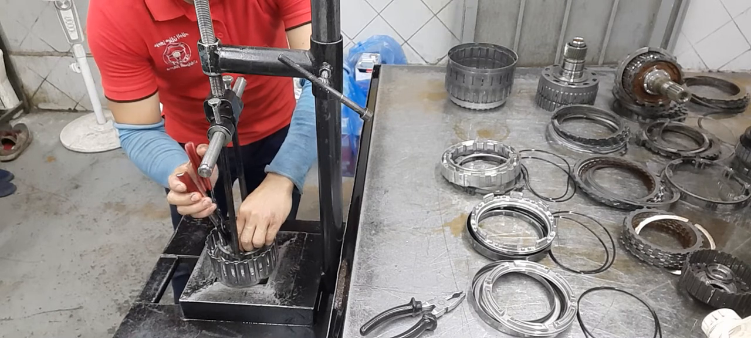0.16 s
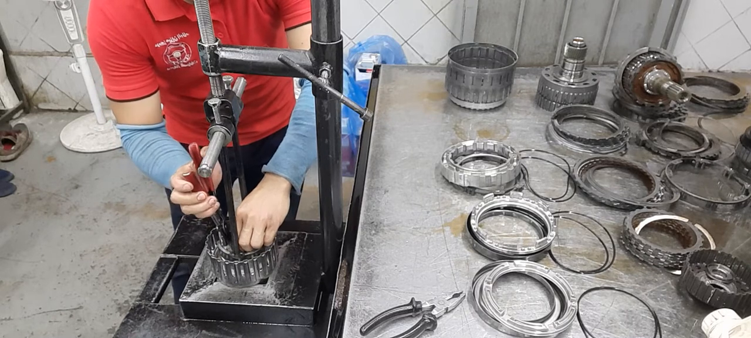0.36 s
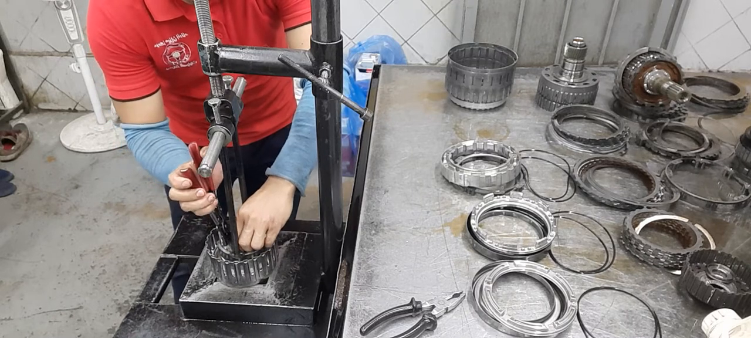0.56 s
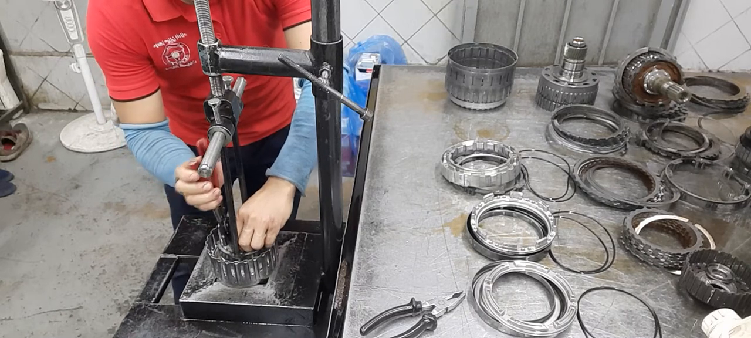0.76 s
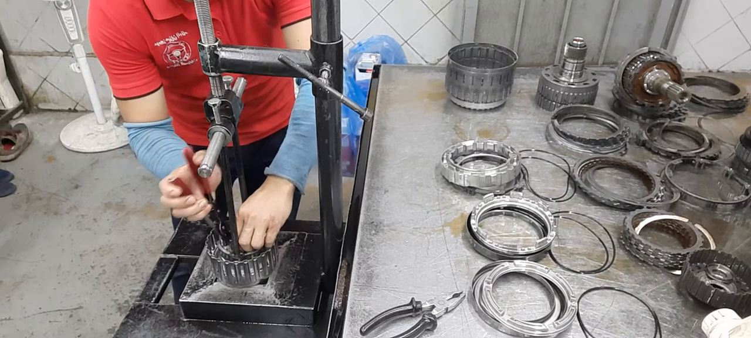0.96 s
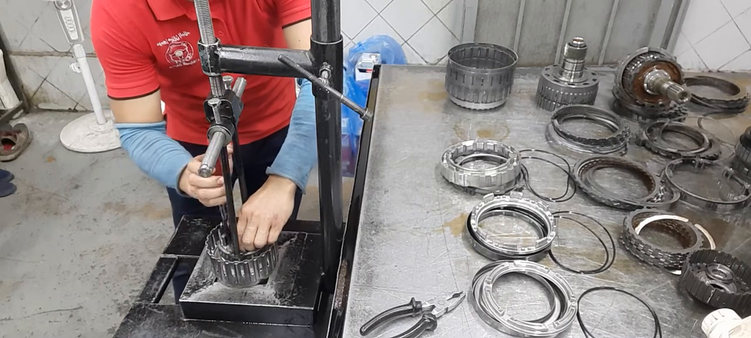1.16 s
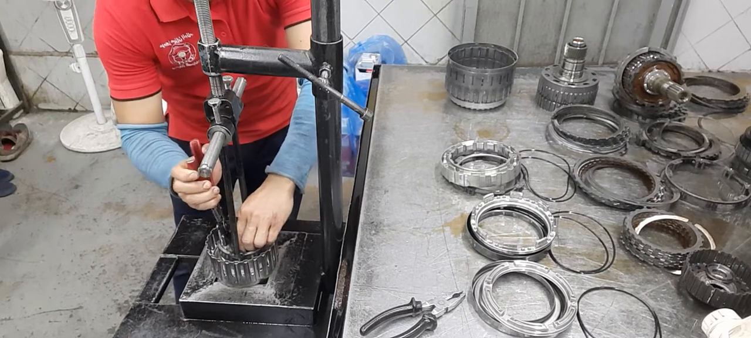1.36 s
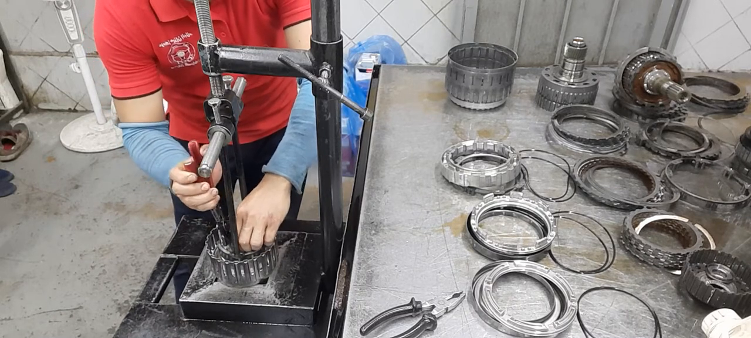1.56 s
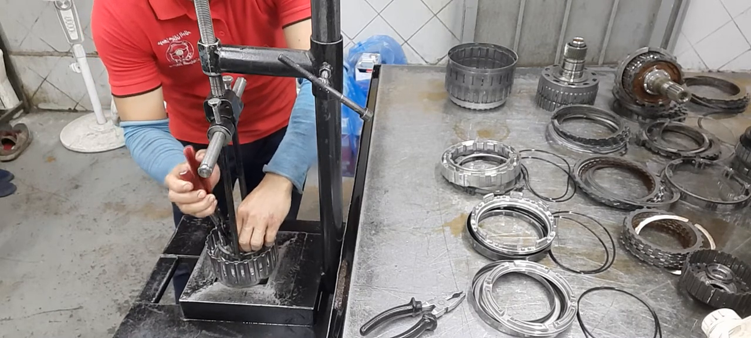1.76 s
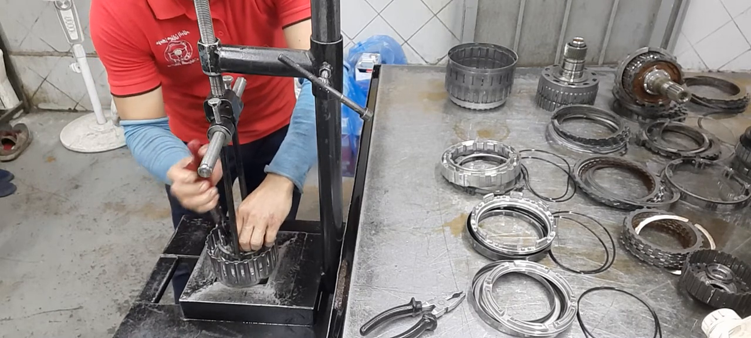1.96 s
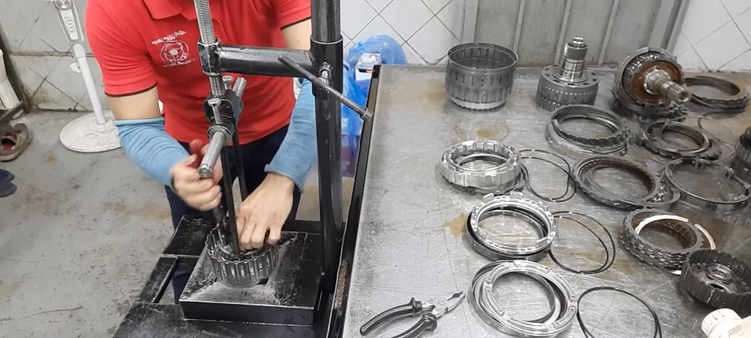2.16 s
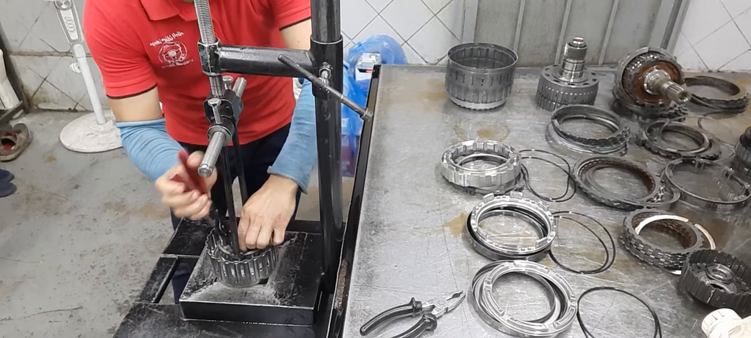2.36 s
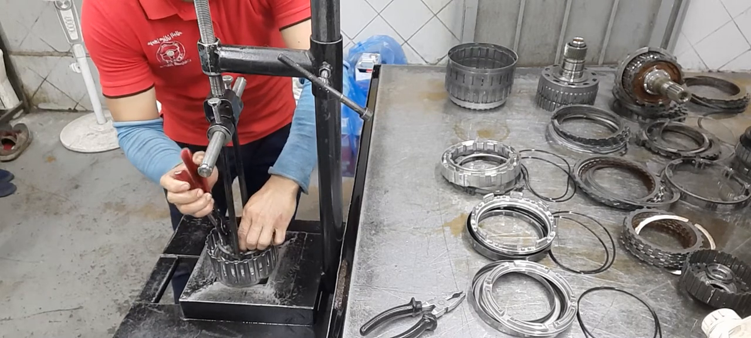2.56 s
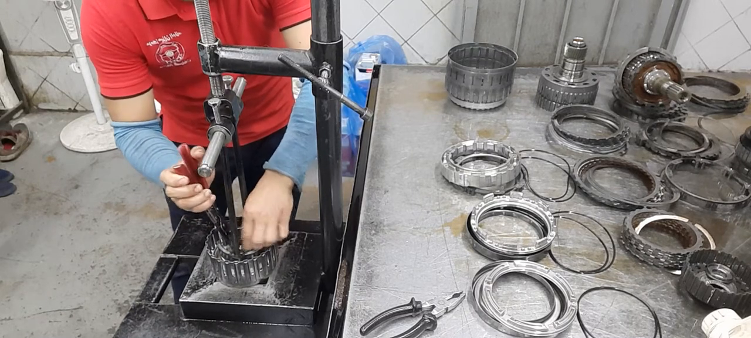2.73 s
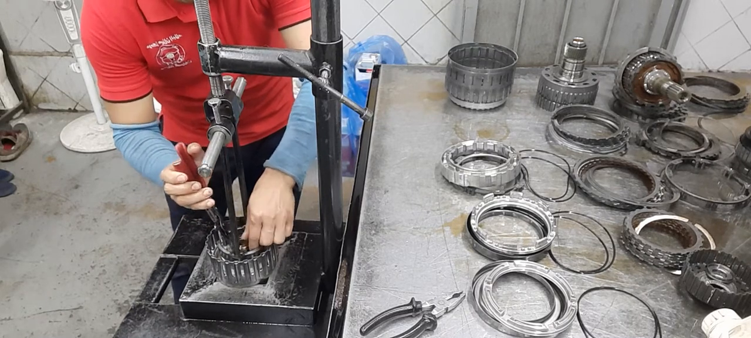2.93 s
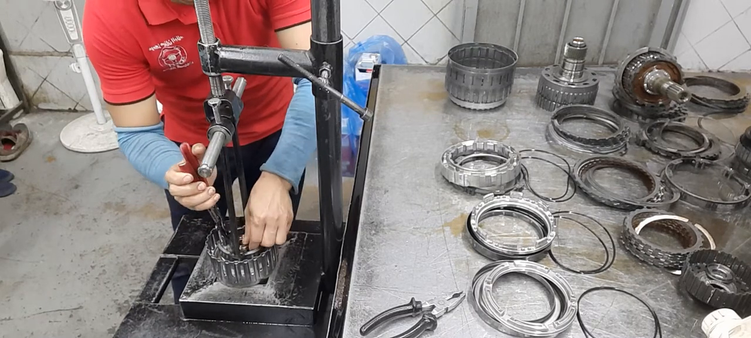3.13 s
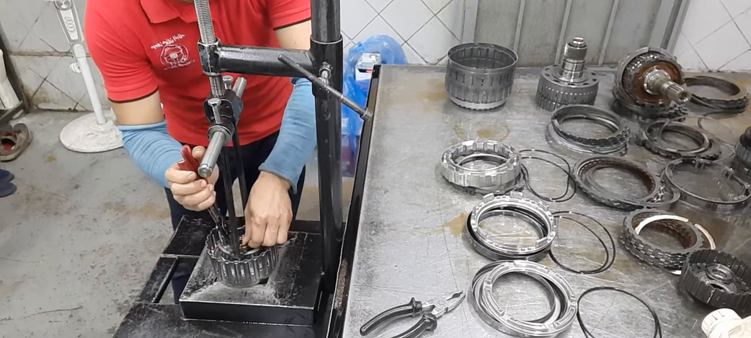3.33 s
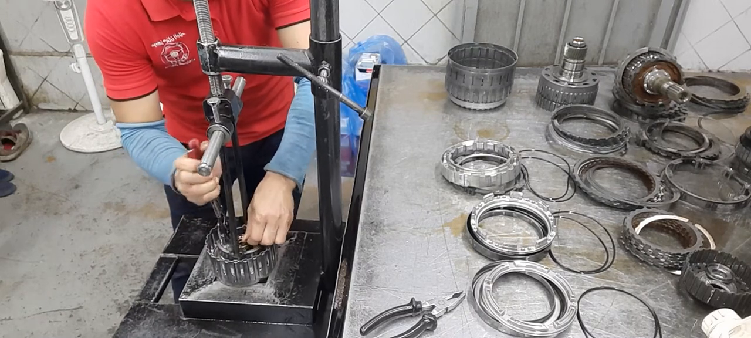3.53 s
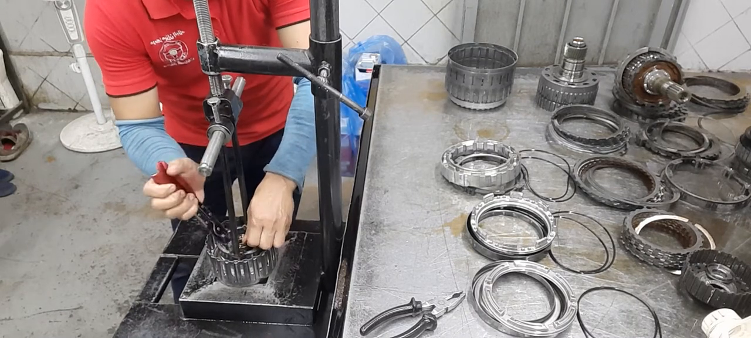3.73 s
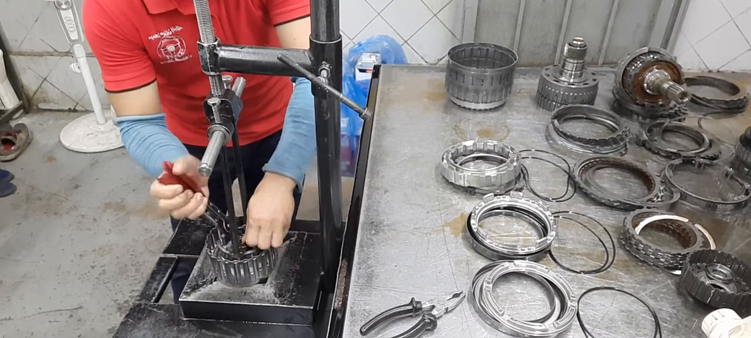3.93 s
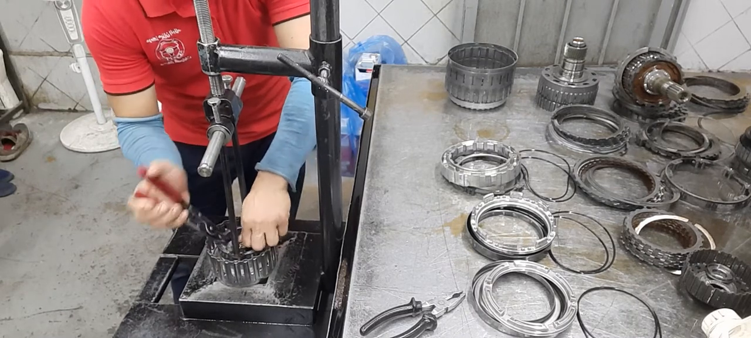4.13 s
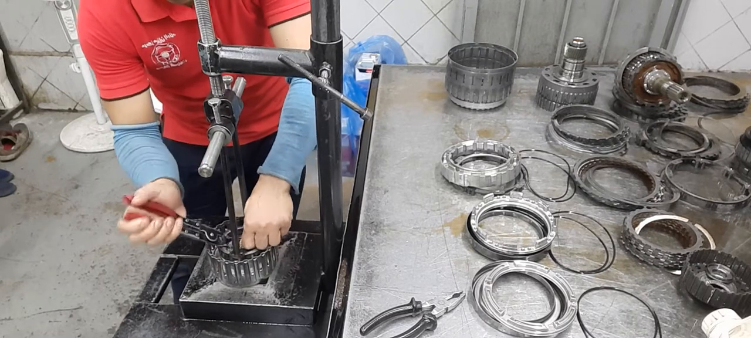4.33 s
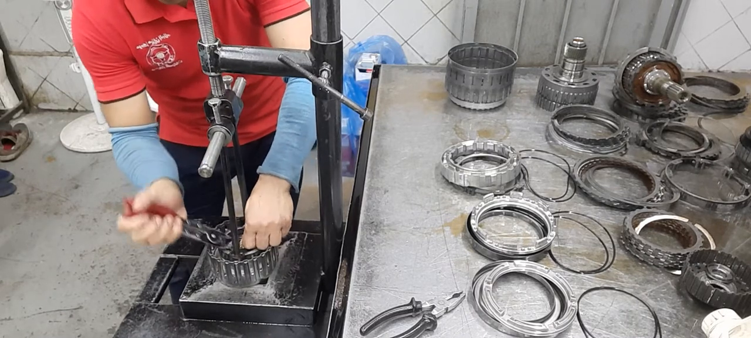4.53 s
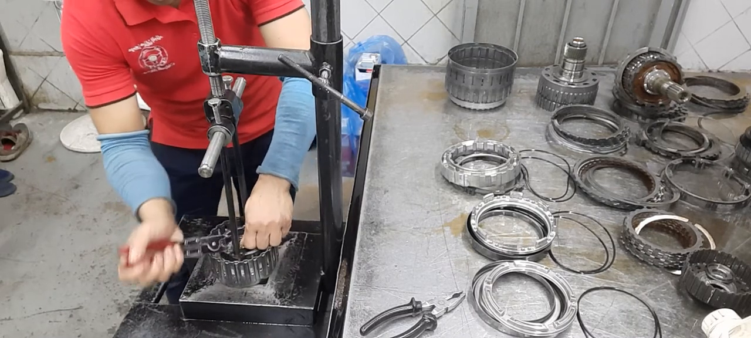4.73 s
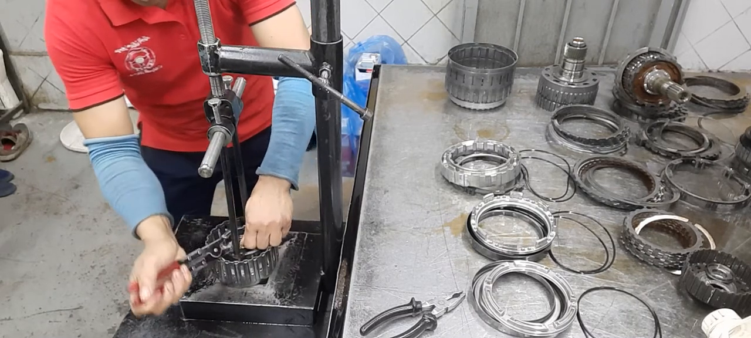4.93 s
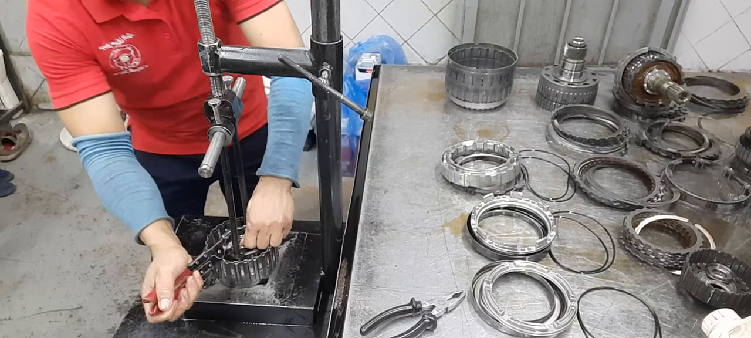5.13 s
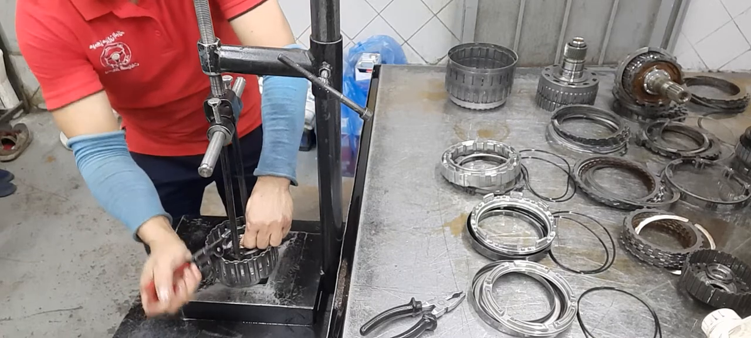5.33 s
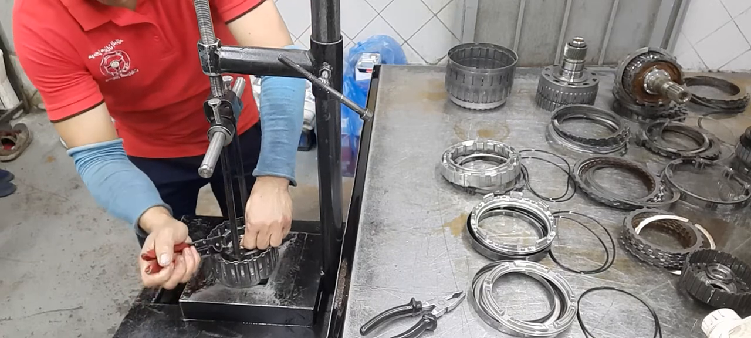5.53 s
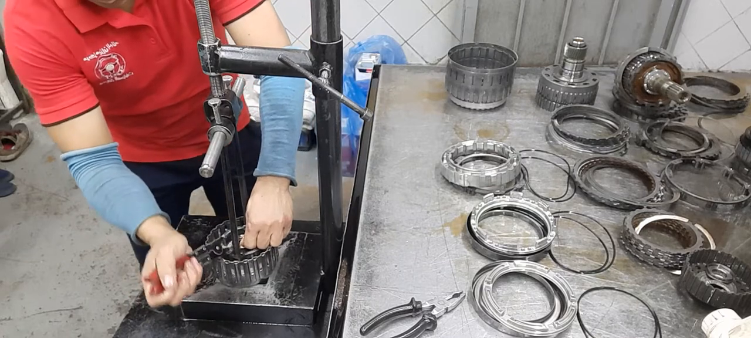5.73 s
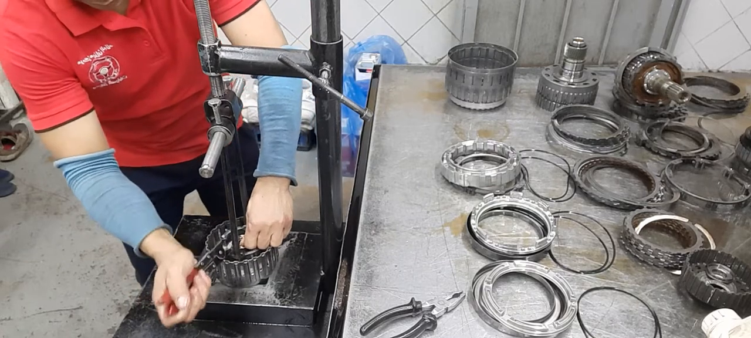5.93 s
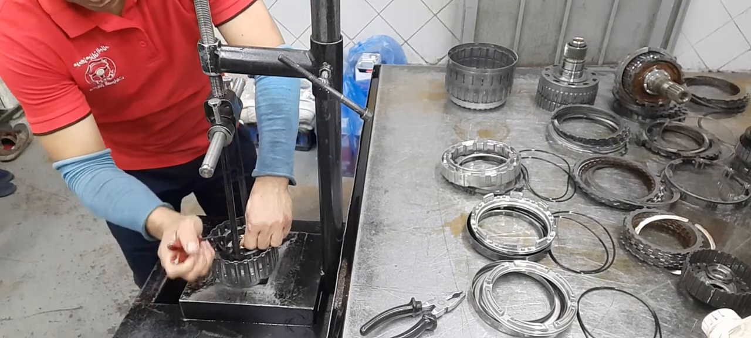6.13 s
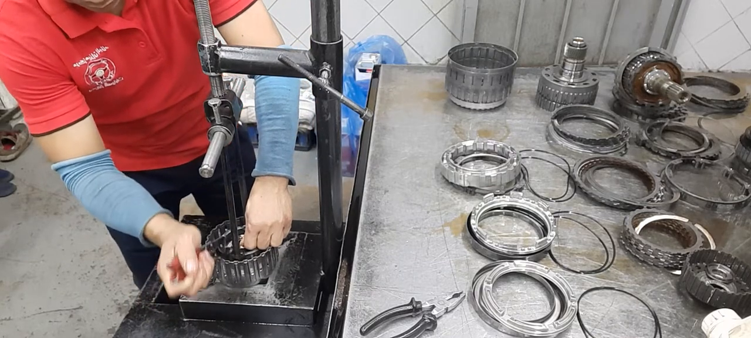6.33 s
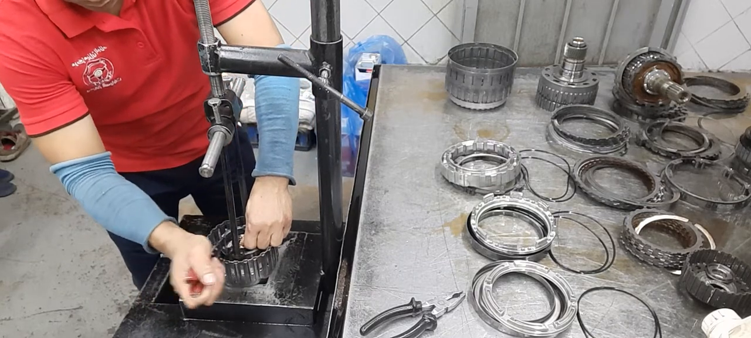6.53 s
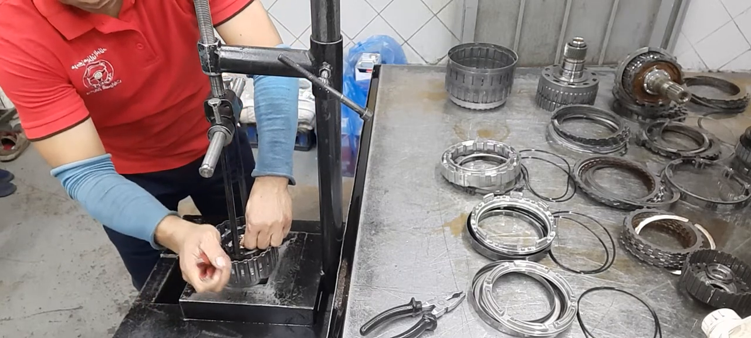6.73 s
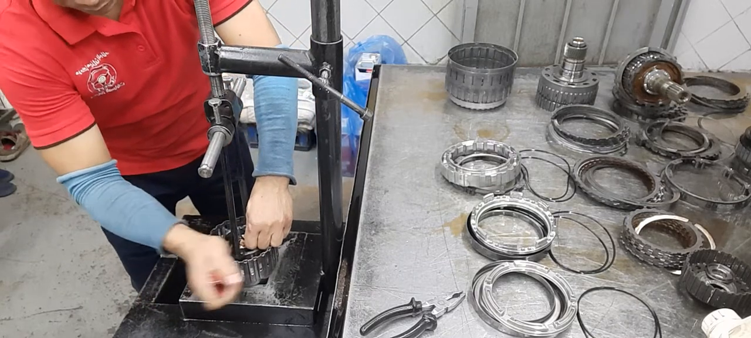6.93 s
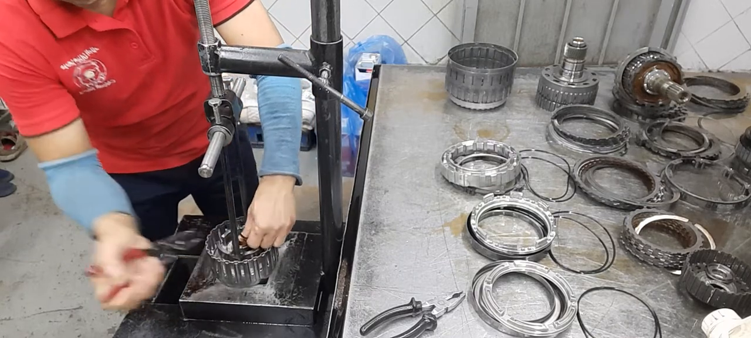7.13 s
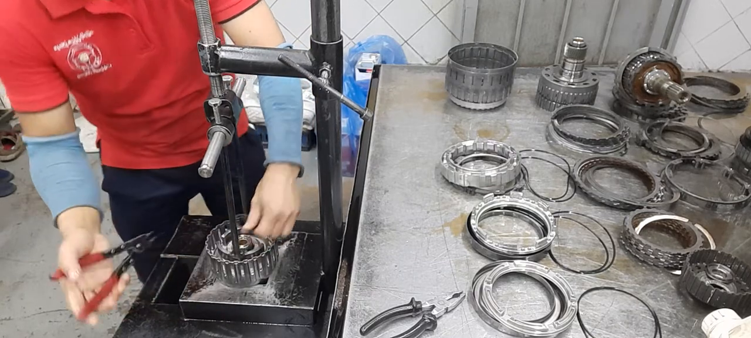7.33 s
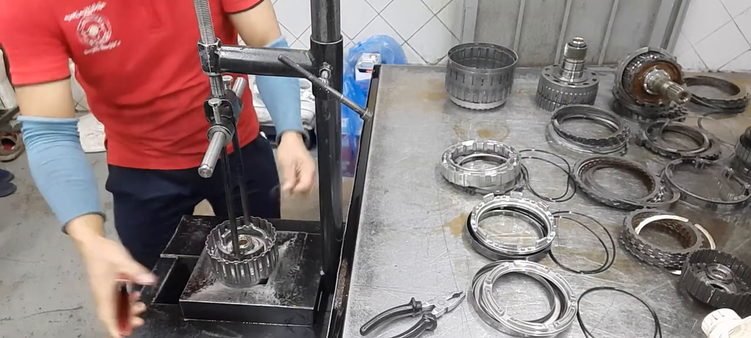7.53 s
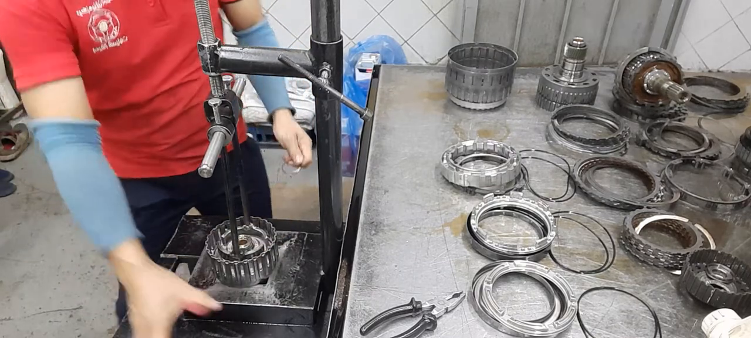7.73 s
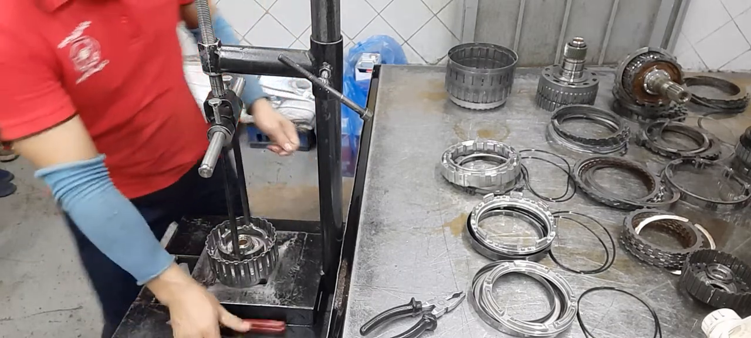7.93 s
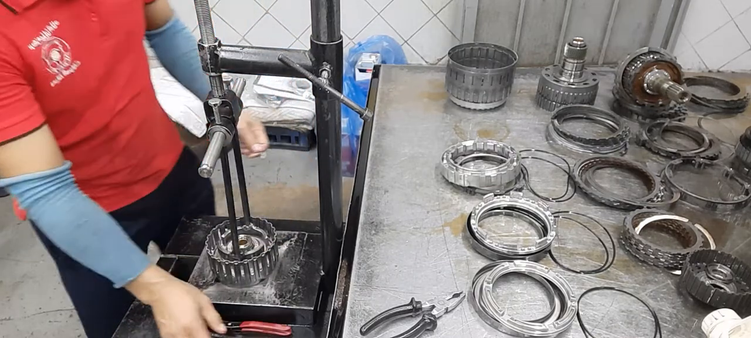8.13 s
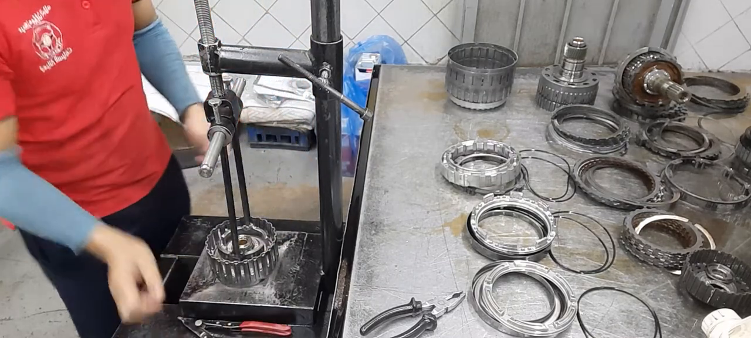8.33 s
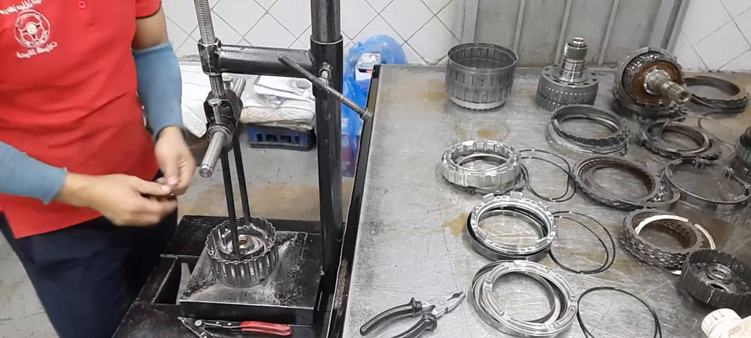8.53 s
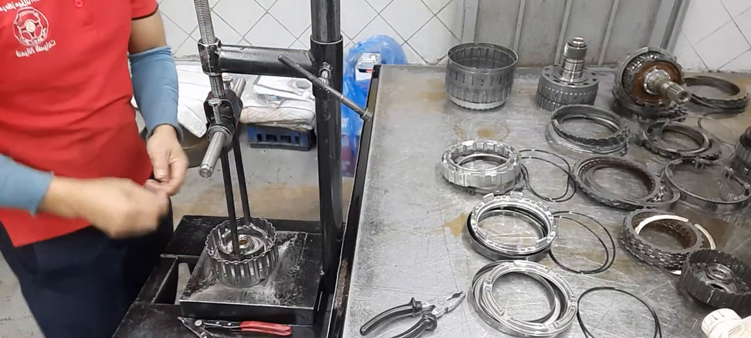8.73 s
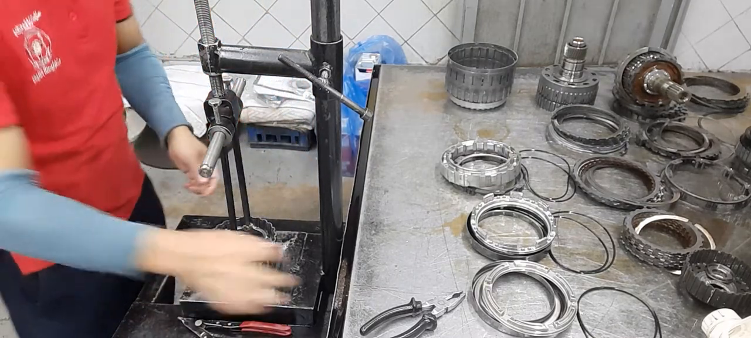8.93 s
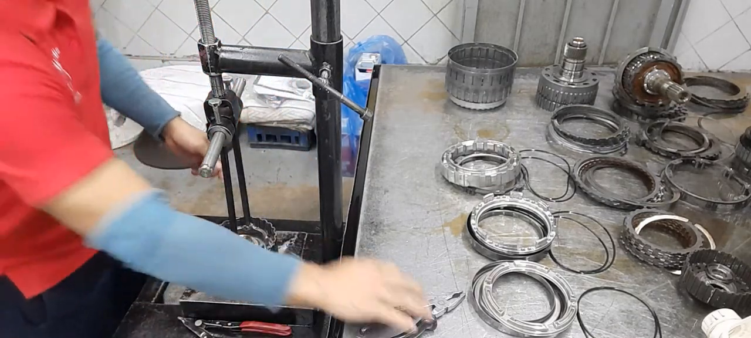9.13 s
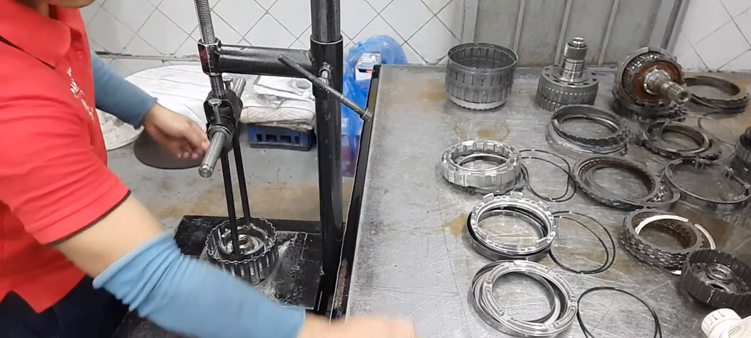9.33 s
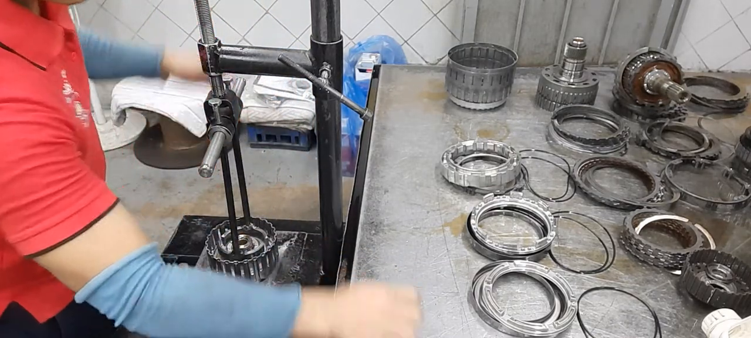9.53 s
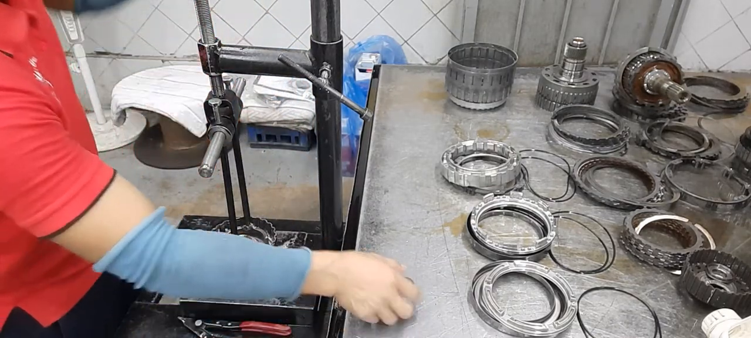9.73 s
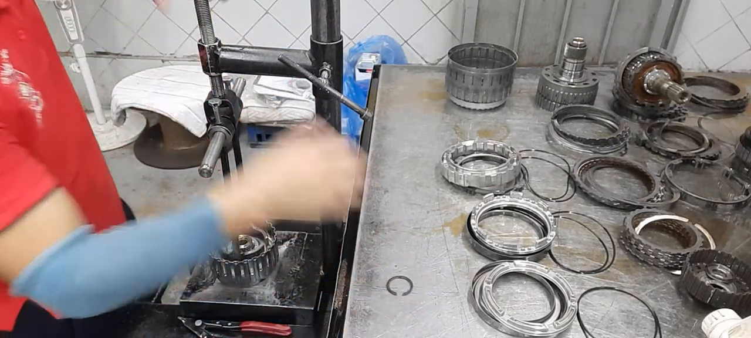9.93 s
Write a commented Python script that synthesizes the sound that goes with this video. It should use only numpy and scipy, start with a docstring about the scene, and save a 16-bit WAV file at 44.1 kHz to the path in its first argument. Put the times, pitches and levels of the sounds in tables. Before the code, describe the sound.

Sharp metal clicks and a few short scrapes come at uneven intervals as pliers work at a ring in a steel drum, close by in a slightly echoing workshop. They build to a loud snap, and a second later the pliers drop and bounce on metal. Finally the ring scrapes across a steel bench and rocks flat with a thin, bright ringing. A low fan hum runs underneath.

```python
"""A fan hums in a hard-walled workshop. From 1 s, pliers click and slip on a snap ring in a steel clutch drum
under a hand-lever press, each impact exciting the modes of the drum and the ring; at 2 s a horn toots far off.
Near 6.8 s the ring springs free. Sleeves rustle, and at 7.9 s the pliers drop and bounce on the press bed. From
9.2 s the ring slides along a steel bench with the noise of friction, then is laid down and rocks flat,
jingling, while a plate beside it is nudged once."""
import sys
import numpy as np
from scipy import signal
from scipy.fft import rfft, irfft
from scipy.io import wavfile
from scipy.ndimage import map_coordinates

SR = 44100
rng = np.random.default_rng(int(sys.argv[2]) if len(sys.argv) > 2 else 0)


def put_to_file(sound):
    """Save the sound as 16-bit audio at rate SR, in the file named by the first command-line argument."""
    columns = np.atleast_2d(sound).T  # one column per channel
    safe = np.clip(columns, -1, 1)
    whole_steps = np.round(safe * 32767)
    wavfile.write(sys.argv[1], SR, whole_steps.astype(np.int16))


N = 439677
TIME = np.arange(N) / SR
RESPONSE_SIZE = 32768  # samples in one impulse response


# pliers and ring striking the drum: start_s, strength_db, contact_ms, boom_db, ping_hz, ping_db
DRUM_IMPACTS = [(1.093, -10, 0.34, -9, 1770, 11), (1.124, -7, 0.23, 6, 1790, -6),
                (2.0503, 1, .04, 11, 5800, 17.5), (2.3137, -10, 0.13, 1, 2050, 3),
                (2.3786, 4, 0.085, 12, 1760, 15.5), (2.845, -13.5, 0.093, 3.5, 6160, 3),
                (3.2386, 11.5, .11, 15.5, 2770, 8.5), (3.248, 10, .04, 16, 1560, 7),
                (3.722, 13, 0.11, 17, 10500, 5), (3.8009, 10.5, 0.14, 14, 2410, 10),
                (4.1995, -13, 0.13, -11, 13900, 8), (4.2264, -3.5, 0.18, -9, 1060, 2),
                (4.2473, -1.5, 0.18, 12.5, 1060, 10), (4.562, 5, .6, 12, 1050, -4),
                (4.602, -1, 0.22, 21, 636, 18), (4.9388, 11.5, 1, 11, 2280, 8.5),
                (5.0276, 3.5, 0.36, 9, 5700, 6.5), (5.3987, 9.5, 0.3, 20.5, 5800, 10.5),
                (5.7948, 10.5, 0.91, 10.5, 1930, 11.5), (5.8831, 12, 0.52, 11.5, 1900, 2),
                (6.587, -1.5, 0.19, 11.5, 1013, 14), (6.8088, 17, 0.029, 17, 13600, 7.5),
                (6.818, 20.5, 0.26, 19, 5840, 11), (6.861, 16, 0.26, 29.5, 1100, 10),
                (6.875, 14.5, 0.35, 21, 1730, 14), (6.98, -2.5, 0.13, 13.5, 2330, 12),
                (6.998, -9.5, .12, -5, 5250, 3)]
# modes of the drum, the highest ones from the snap ring: pitch_hz, level_db, t60_s
DRUM_AND_RING_RESONANCES = [(328, 2, .4), (378, -4, .4), (781, -7, .45), (985, -5, .35), (1050, -3, .35),
                            (1136, -3, .35), (1615, -7, .3), (1790, -5, .25), (2480, -5, .3), (2790, -5, .3),
                            (5679, -5, .2), (6158, -2, .2), (8253, 0, .18), (10910, 1, .18), (11680, 0, .13),
                            (13910, -1, .17)]

def drum_clicks():
    """Impact excitation: each slip of the pliers or ring sets the drum and the ring vibrating in their normal
    modes."""
    return impacts(DRUM_IMPACTS, DRUM_AND_RING_RESONANCES, tilt_db=-0.9, ring_db=-15.5,
                   direct_db=-0.5, room_db=-4, left_db=4.5, lead_s=.00016)


# the pliers landing and bouncing: start_s, strength_db, contact_ms, boom_db
PLIERS_BOUNCES = [(7.8783, 13.5, 0.035, 23), (7.892, 24, 0.26, 22.5), (7.907, 6.5, .04, 15),
                  (7.92, 22.5, .26, 17), (7.957, 22.5, 0.29, 16), (7.982, 11.5, 0.32, -3.5)]
# free modes of the press bed: pitch_hz, level_db, t60_s
BED_RESONANCES = [(327.7, -2.5, 0.44), (504, -1, 0.18), (560, -7.5, 0.31), (572, -5.5, 0.73),
                  (810, -11.5, 0.63), (1047, -6, 0.98), (1117, -0.5, 0.35), (1210, -5, 0.16),
                  (1185, 2.5, 0.083), (1300, 0.5, 0.27), (1350, 1.5, 0.28), (1696, -8, 1), (1744, -6.5, 1),
                  (2099, -15.5, 0.25), (2240, -13.5, 0.53), (2720, -11, 0.16), (2685, -16.5, 0.54),
                  (3040, 7, 0.28), (3073, 3.5, 0.93), (2994, -14.5, 0.39), (3290, 1, 0.22), (3854, -3, .3),
                  (4670, -10, .3)]

def pliers_drop(max_t60_s=.5, thump_s=7.892, thump_hz=85, decay_s=.0084):
    """Contact damping: the pliers ring the bed and damp it by lying there; their weight rocks the stand."""
    damped = [(hz, db, min(t60, max_t60_s)) for hz, db, t60 in BED_RESONANCES]
    clatter = impacts(PLIERS_BOUNCES, damped, tilt_db=0.06, ring_db=-7.5,
                      direct_db=-0.5, room_db=-1.5, left_db=5, lead_s=.00016)
    age = np.maximum(TIME - thump_s, 0)
    thump = undb(-23) * np.exp(-age / decay_s) * np.sin(2 * np.pi * thump_hz * age)
    return clatter + thump


# parts knocking on the bench: start_s, strength_db, contact_ms, boom_db
BENCH_IMPACTS = [(9.1704, 5.5, 0.26, -5), (9.229, 5, 0.25, 17), (9.2417, 0.5, .12, 17.5),
                 (9.4782, 16, .52, -6), (9.488, -4, 0.091, 16.5), (9.4965, -13, 0.063, -4),
                 (9.5085, -19, 0.15, -3), (9.5211, -2, 0.037, 16.5), (9.526, 1, 0.16, -4)]
# modes of the bench top: pitch_hz, level_db, t60_s
BENCH_RESONANCES = [(185, -4, .5), (240, -5, .4), (610, -5, .3), (1350, -6, .25), (2200, -7, .3),
                    (3560, -7, .35), (7500, -1, .1), (11400, -2, .15)]

def bench_knocks():
    """Impact excitation: parts crack against the steel top and weakly ring its modes."""
    return impacts(BENCH_IMPACTS, BENCH_RESONANCES, tilt_db=0.5, ring_db=-18,
                   direct_db=1, room_db=-2, left_db=5.5, lead_s=.00004)


# the snap ring settling: start_s, strength_db, contact_ms, boom_db
RING_IMPACTS = [(9.7515, 5.5, 0.22, -1), (9.76, -4, 0.18, -7), (9.889, 3, 0.25, -6),
                (9.899, -12.5, 0.036, -1)]
# modes of the free ring: pitch_hz, level_db, t60_s
RING_RESONANCES = [(2170, -14, 0.36), (5750, -23, .25), (8400, -3.5, 0.89), (11009, 6.5, 0.86),
                   (11000, -3, 0.28), (13400, 10.5, 0.61), (13900, 12, .25), (13500, -4, .7)]

def ring_jingle():
    """Free vibration: the ring's high, lightly damped modes sound on after each tap."""
    return impacts(RING_IMPACTS, RING_RESONANCES, tilt_db=2, ring_db=1,
                   direct_db=-3.5, room_db=-3, left_db=-3.5, lead_s=.00002)


# the ring rocking flat: start_s, level_db
RING_ROCKS = [(9.755, -32), (9.83, -40), (9.888, -29)]
# its top modes, damped by contact: pitch_hz, level_db, t60_s
CHATTER_RESONANCES = [(8274, -11, .08), (11010, 0, .05), (13650, 0, .04), (13930, -1, .04)]

def ring_chatter(rate_hz=500, rise_s=.012, fall_db_per_s=206):
    """Repeated excitation: rapid touches on the bench renew the ring's top modes; each rock dies away."""
    shimmer = convolve(catches(rate_hz, 0), irfft(ringing(CHATTER_RESONANCES)))
    rocking = sum(ramp(TIME - start, rise_s) * undb(db - fall_db_per_s * np.maximum(TIME - start, 0))
                  for start, db in RING_ROCKS)
    return unit_rms(shimmer) * rocking


# a nudge to a neighbouring steel plate: start_s, strength_db, contact_ms, boom_db
PLATE_IMPACT = [(9.8374, -2.5, 0.19, -6)]
# modes of that plate: pitch_hz, level_db, t60_s
PLATE_RESONANCES = [(4170, -18, 0.55), (5860, -1, 0.8), (11010, -0.5, .6)]

def plate_tap():
    """Free vibration: the plate, struck once, rings in three inharmonic modes."""
    return impacts(PLATE_IMPACT, PLATE_RESONANCES, tilt_db=-0.2, ring_db=2.5,
                   direct_db=0.5, room_db=-1, left_db=-6, lead_s=.00002)


# tone shared by all impacts, including the microphone's colour: frequency_hz, gain_db
IMPACT_COLOUR = [(30, -42.5), (120, -17.5), (230, -11.5), (310, -19.5), (480, -5.5), (700, -3), (1050, -1),
                 (3200, -2), (4300, -5), (6000, -3.5), (8200, 0.5), (9400, -5), (11200, 1), (15500, -3)]
# share of an impact that arrives directly: frequency_hz, gain_db
DIRECT_SHARE = [(300, -15), (2000, -6.5), (5000, -1.5), (12000, -2)]

def impacts(table, modes, tilt_db, ring_db, direct_db, room_db, left_db, lead_s):
    """Superposition: each blow's spectrum drives a direct crack, the room's echo and the part's modes."""
    hz, out = freqs(RESPONSE_SIZE), np.zeros((2, N + RESPONSE_SIZE))
    boom_hz, boom_width_hz = 368.6, 83.5  # low boom that each blow excites in the room
    boom = 1 / np.sqrt(1 + (2 * (hz - boom_hz) / boom_width_hz) ** 4)
    straight, colour = gain_curve(DIRECT_SHARE, hz), gain_curve(IMPACT_COLOUR, hz)
    fade_out = np.clip(np.linspace(4, -.2, RESPONSE_SIZE), 0, 1)
    for start_s, strength_db, contact_ms, boom_db, *ping in table:
        # bright contacts crack more and feed the room less
        sharp_db = 0.32 * max(contact_db(12500, contact_ms, tilt_db), -25)
        gain = colour * undb(strength_db + contact_db(hz, contact_ms, tilt_db))
        if ping:  # the spot struck favours one resonance
            ping_hz, ping_db = ping
            gain *= undb(ping_db / (1 + ((hz / ping_hz - 1) / .087) ** 2))
        # short-lived overtones ripple the spectrum anew at every blow
        gain *= undb(3 * wander(260, len(hz)) * ramp(hz, 2000) - .5)
        drive = minimum_phase(np.hypot(gain, undb(boom_db) * boom))
        direct = undb(direct_db + sharp_db) * straight * crack(left_db, lead_s)
        echo = undb(room_db - max(sharp_db, 0)) * room()
        ring = undb(ring_db) * ringing(modes)
        start = int(start_s * SR)
        out[:, start:start + RESPONSE_SIZE] += fade_out * irfft((direct + echo + ring) * drive)
    return out[:, :N]


def contact_db(hz, contact_ms, tilt_db, dull_db_per_octave=11.5):
    """A force pulse is a low-pass above 1 / its duration; the part adds tilt_db per octave above 1 kHz."""
    above_corner = np.log2(1 + (hz * contact_ms / 1000) ** 4) / 4
    above_1khz = np.log2(np.maximum(hz / 1000, 1))
    return tilt_db * above_1khz - dull_db_per_octave * above_corner


def crack(left_db, lead_s, decay_s=0.001):
    """Direct sound: spectra of a burst of dense ringing, placed by level and arrival-time differences."""
    hz, t = freqs(RESPONSE_SIZE), np.arange(RESPONSE_SIZE) / SR
    envelope = np.exp(-t / decay_s) * (1 - np.exp(-2 * t / decay_s))
    common, *own = rng.standard_normal((3, RESPONSE_SIZE))
    left, right = rfft(unit_energy((common + .5 * np.array(own)) * envelope))
    delay = np.exp(-2j * np.pi * hz * lead_s)
    return np.array([left * undb(left_db / 2), right * undb(-left_db / 2) * delay])


def ringing(modes):
    """Modal summation: stereo spectra of damped sinusoids in random phases."""
    t, out = np.arange(RESPONSE_SIZE) / SR, 0
    for hz, db, t60 in modes:
        phase = rng.uniform(0, 2 * np.pi)
        spread = rng.uniform(-1, 1) * min(hz / 1000, 2) * np.array([[1], [-1]])
        out = out + undb(db - 60 * t / t60) * np.sin(2 * np.pi * hz * t + phase + spread)
    return rfft(out / np.linalg.norm(out) * np.sqrt(2))


# the ring pushed along the bench: start_s, length_s, level_db
SLIDE_STROKES = [(9.215, 0.22, -35), (9.49, 0.067, -38.5)]
# spectrum of the slide: frequency_hz, gain_db
SLIDE_SPECTRUM = [(40, -35), (70, -9), (130, -17), (190, -13), (260, -5), (330, 1), (420, -5.5), (500, -3),
                  (750, -11.5), (2500, -12.5), (7200, -23), (9700, -30), (12400, -24), (16000, -32)]

def ring_slide():
    """Sliding friction: the ring catches on the bench so often that the contacts merge into noise."""
    return friction(SLIDE_STROKES, SLIDE_SPECTRUM, ramp_s=.012, rate_hz=2000, spread_db=3, direct_db=-5)


# hand and part moving over the bench: start_s, length_s, level_db
GRUMBLE_STROKES = [(9.24, .2, -54), (9.51, .2, -44), (9.78, .17, -66)]
# low response of the bench top: frequency_hz, gain_db
GRUMBLE_SPECTRUM = [(60, -23), (120, -6), (180, 3), (250, 0), (450, -3), (900, -21), (3000, -62)]

def bench_grumble():
    """Forced vibration: the top rumbles under the sliding hand and part."""
    return friction(GRUMBLE_STROKES, GRUMBLE_SPECTRUM,
                    ramp_s=.025, rate_hz=400, spread_db=-0.5, direct_db=-4)


# the pliers scraping in the groove: start_s, length_s, level_db
SCRAPE_STROKES = [(3.712, 0.017, -27), (4.23, 0.036, -62), (4.395, 0.036, -53), (4.47, 0.027, -53),
                  (4.51, 0.067, -49)]
# spectrum of the scrape: frequency_hz, gain_db
SCRAPE_SPECTRUM = [(500, -13), (1200, -5), (2400, 2), (3000, 0), (3900, 9.5), (5000, -9.5), (8000, -7.5),
                   (15000, -23)]

def pliers_scrape():
    """Sliding friction: the tips catch in the groove in short, bright rasps."""
    return friction(SCRAPE_STROKES, SCRAPE_SPECTRUM,
                    ramp_s=.008, rate_hz=560, spread_db=1.5, direct_db=-2.5)


def friction(strokes, spectrum, ramp_s, rate_hz, spread_db, direct_db):
    """Source and filter: tiny catches follow the hand's pressure, are coloured, and smear in the room."""
    paths = room() + undb(direct_db) * crack(0, 0)
    response = irfft(paths * minimum_phase(gain_curve(spectrum, freqs(RESPONSE_SIZE))))
    pressure = sum(undb(db) * ramp(np.minimum(TIME - start, start + length - TIME), ramp_s)
                   for start, length, db in strokes)
    return convolve(unit_rms(catches(rate_hz, spread_db)) * pressure, unit_energy(response))


def catches(rate_hz, spread_db):
    """Poisson process: tiny contacts at random moments, uneven in size."""
    impulses = (rng.random(N) < rate_hz / SR) * rng.standard_normal(N)
    return impulses * undb(spread_db * np.minimum(rng.exponential(size=N), 3))


# sleeves and hands brushing: centre_s, length_s, level_db
CLOTH_SWELLS = [(7.636, 0.13, -57), (7.783, 0.04, -56.5), (7.84, 0.083, -48.5), (8.135, 0.099, -52),
                (8.267, 0.19, -49), (8.556, 0.11, -65.5), (8.835, 0.093, -63.5)]
# spectrum of the cloth: frequency_hz, gain_db
CLOTH_SPECTRUM = [(300, -13.5), (1200, 3.5), (2500, 1.5), (4500, -3), (6500, -2.5), (9500, -12),
                  (12500, -8.5), (16000, -12.5)]

def sleeves():
    """Friction noise: cloth brushes by in soft Gaussian swells."""
    swells = sum(undb(db) * np.exp(-(2 * (TIME - centre) / length) ** 2)
                 for centre, length, db in CLOTH_SWELLS)
    return noise(CLOTH_SPECTRUM) * swells


# partials of the horn: harmonic_number, relative_db
HORN_HARMONICS = [(2, -59), (3, -64), (4, -65), (5, -65), (6, -66)]

def horn(pitch_hz=408, start_s=2.05, end_s=2.47, fade_s=0.09, gain_db=2):
    """Harmonic series without its fundamental: a faint toot from the street, each partial wavering."""
    gate = ramp(TIME - start_s, fade_s) * ramp(end_s - TIME, fade_s)
    tone = 0
    for harmonic, db in HORN_HARMONICS:
        cycles = round(harmonic) * pitch_hz * TIME + rng.random((2, 1)) + .13 * wander(300, N)
        tone = tone + undb(db + 2 * wander(300, N)) * np.sin(2 * np.pi * cycles)
    return np.sqrt(2) * undb(gain_db) * gate * tone


# rumble of the fan and workshop air: frequency_hz, gain_db
RUMBLE_SPECTRUM = [(25, -37.5), (38, -23), (48, -1), (68, 3), (86, -4.5), (102, -9), (135, -8),
                   (210, -14.5), (275, -9.5), (310, -5), (385, -6), (425, -14.5), (520, -17.5), (780, -22),
                   (1060, -19), (1450, -27.5), (2400, -36), (4500, -47.5), (9000, -62)]
# narrow tones in the background hum: pitch_hz, level_db
HUM_TONES = [(60, -60.5), (118, -66.5), (333, -56), (382, -59), (974, -69), (1061, -64.5), (1109, -77)]
# thin hiss of the air: frequency_hz, gain_db
HISS_SPECTRUM = [(1500, 5.5), (2600, -23), (3400, 12.5), (4600, -8), (6300, 8), (8000, -4), (9600, -14),
                 (11500, -8), (15500, -7)]
# hum and hiss are turned down after the loudest blows, then return: start_s, depth_db
BACKGROUND_DIPS = [(6.82, 2), (7.88, 7.5)]

def fan(half_width_hz=3, sink_s=.082, return_s=9.17, rise_s=.12):
    """Tonal and broadband noise: narrow noise bands are heard as wavering tones over rumble and hiss."""
    hz = freqs(N)
    peaks = sum(undb(db) / (1 + ((hz - pitch) / half_width_hz) ** 2) for pitch, db in HUM_TONES)
    tones = irfft(diffuse(N) * peaks, N) * np.sqrt(SR / np.pi / half_width_hz)
    sunk_db = sum(depth_db * ramp(TIME - start, sink_s) for start, depth_db in BACKGROUND_DIPS)
    dip_db = -sunk_db * (1 - ramp(TIME - return_s, rise_s))
    hum = undb(-45) * noise(RUMBLE_SPECTRUM) + tones
    hiss = undb(-69.5) * noise(HISS_SPECTRUM)
    return hum * undb(dip_db) + hiss * undb(0.4 * dip_db)


# reverberation times of the workshop: frequency_hz, t60_s
REVERB_TIMES = [(150, 0.27), (350, 0.85), (1000, 0.41), (3000, 0.45), (5500, 0.39), (8000, 0.33),
                (11000, 0.27), (15000, 0.25)]

def room(build_s=0.0063):
    """Reverberation: spectra of a diffuse tail decaying exponentially per band, longest near 350 Hz."""
    hz, t = freqs(RESPONSE_SIZE), np.arange(RESPONSE_SIZE) / SR
    centres, t60s = np.transpose(REVERB_TIMES)
    field, tail = diffuse(RESPONSE_SIZE), 0
    for pick, t60 in zip(np.eye(len(centres)), t60s):
        band = irfft(field * np.interp(np.log(hz), np.log(centres), pick))
        envelope = undb(-60 * t / t60) * (1 - np.exp(-t / build_s))
        tail = tail + band * unit_energy(envelope)
    return rfft(tail)


def diffuse(size, mic_gap_s=0.00048):
    """Diffuse-field coherence: noise spectra at two microphones, alike in bass, unrelated in treble."""
    coherence = .96 * np.sinc(2 * freqs(size) * mic_gap_s)
    mid, side = rfft(rng.standard_normal((2, size))) * np.sqrt([1 + coherence, 1 - coherence])
    return np.array([mid + side, mid - side]) / np.sqrt(2)


def noise(spectrum):
    """Spectral shaping of diffuse noise, rms 1."""
    return unit_rms(irfft(diffuse(N) * gain_curve(spectrum, freqs(N)), N))


def minimum_phase(gain):
    """Folding the cepstrum gives the quickest-starting response with this gain."""
    cepstrum = irfft(np.log(gain))
    half = len(cepstrum) // 2
    cepstrum[1:half] *= 2
    cepstrum[half + 1:] = 0
    return np.exp(rfft(cepstrum))


def convolve(force, response):
    """Pass a mono force through a stereo impulse response."""
    return signal.fftconvolve(force[None], response, axes=1)[:, :N]


def wander(spans, size):
    """A cubic spline through random knots, spread near 1."""
    knots = rng.standard_normal(spans + 1)
    return map_coordinates(knots, [np.linspace(0, spans, size)], order=3, mode="nearest")


def gain_curve(points, hz):
    """Gain from (frequency_hz, gain_db) points on a log-frequency axis."""
    at_hz, db = np.transpose(points)
    return undb(np.interp(np.log(hz), np.log(at_hz), db))


def freqs(size):
    """Bin frequencies, at least 1 Hz."""
    return np.maximum(np.fft.rfftfreq(size, 1 / SR), 1)


def ramp(x, width):
    """Linear rise from 0 to 1 over width."""
    return np.clip(x / width, 0, 1)


def undb(db):
    """Decibels to gain."""
    return 10 ** (np.asarray(db) / 20)


def unit_rms(x):
    """Scale to rms 1."""
    return x / np.sqrt(np.mean(x ** 2))


def unit_energy(x):
    """Scale each channel to energy 1."""
    return x / np.linalg.norm(x, axis=-1, keepdims=True)


def scene():
    """Superposition: press and bench knocks to the left, ring and plate to the right, fan all round."""
    struck = drum_clicks() + pliers_drop() + bench_knocks() + ring_jingle() + plate_tap()
    rubbed = ring_slide() + bench_grumble() + pliers_scrape()
    return struck + rubbed + ring_chatter() + sleeves() + horn() + fan()


def record(dry, left_db=2.0, ceiling=.58, cutoff_hz=15900):
    """Clipping and band limiting: the left microphone is louder, peaks flatten and the top is cut."""
    heard = dry * undb(np.array([[left_db], [-left_db]]) / 2)
    lowpass = signal.ellip(10, .2, 80, cutoff_hz, fs=SR, output="sos")
    return signal.sosfilt(lowpass, np.clip(heard, -ceiling, ceiling))


dry = scene()
out = record(dry)
put_to_file(out)
```